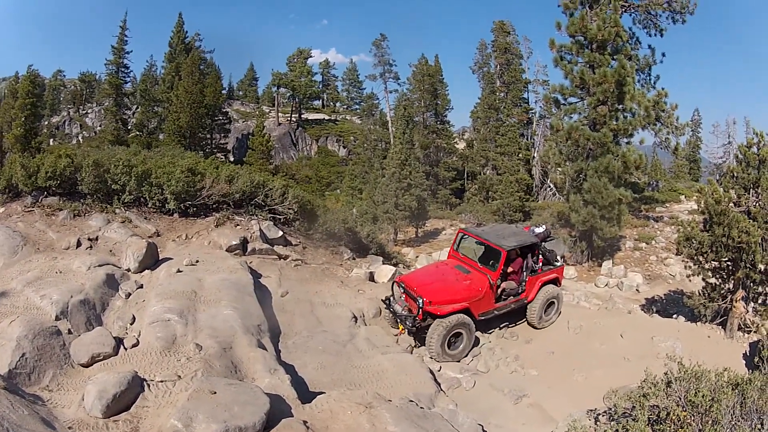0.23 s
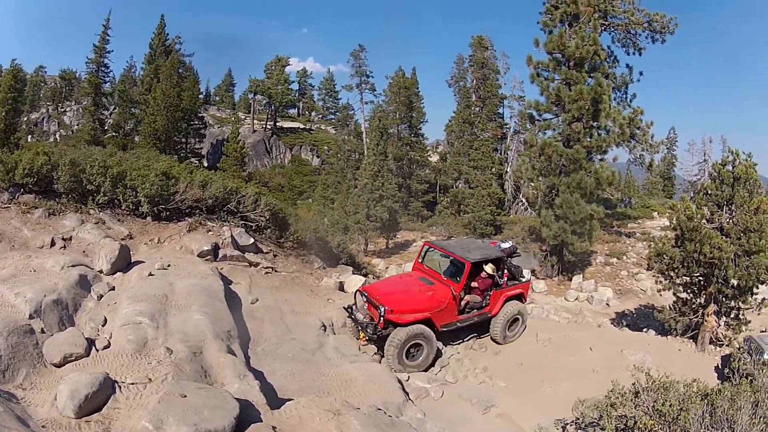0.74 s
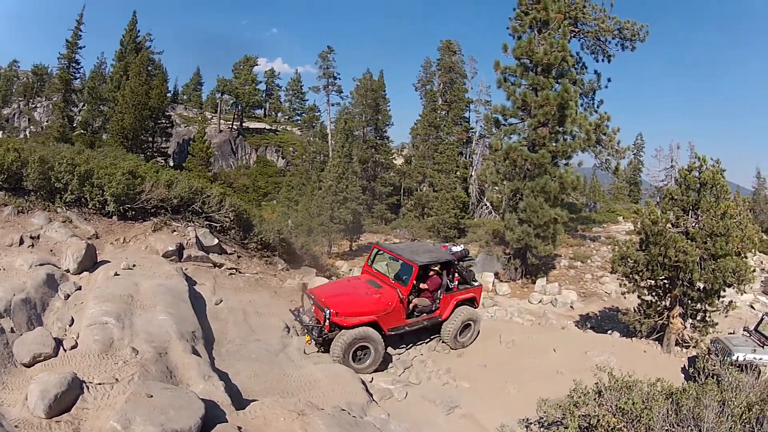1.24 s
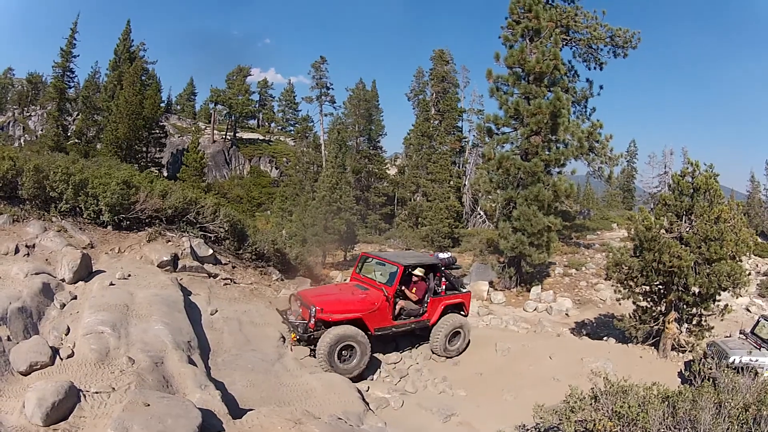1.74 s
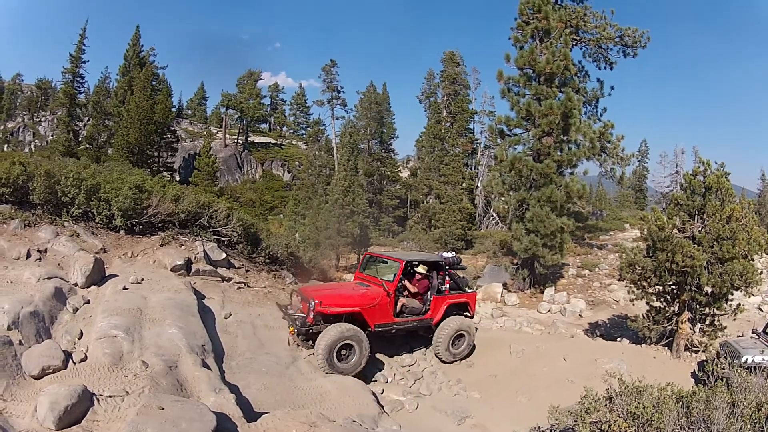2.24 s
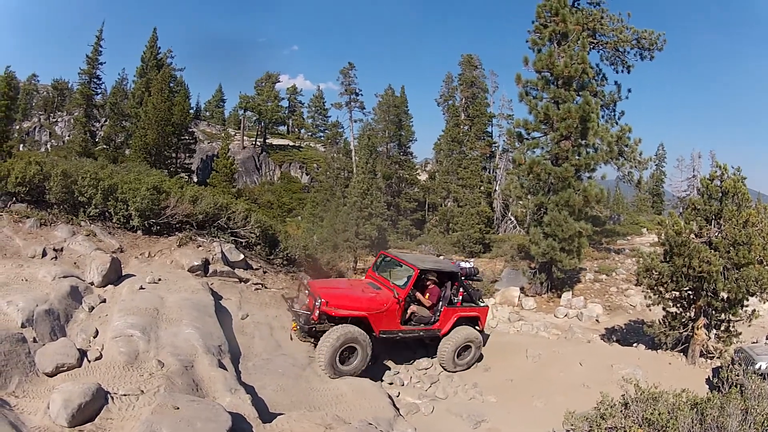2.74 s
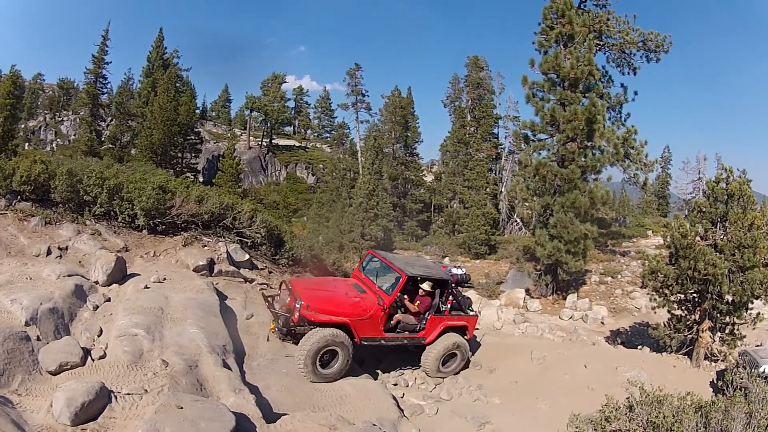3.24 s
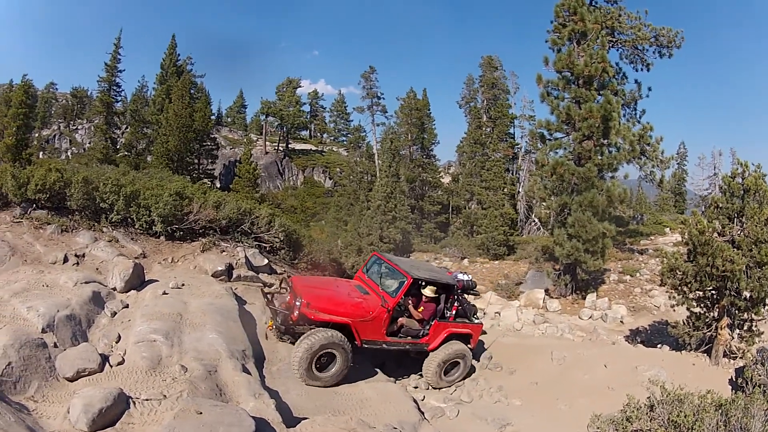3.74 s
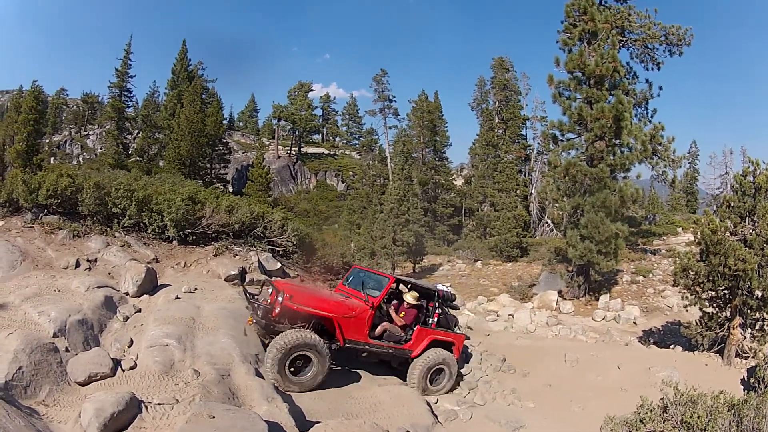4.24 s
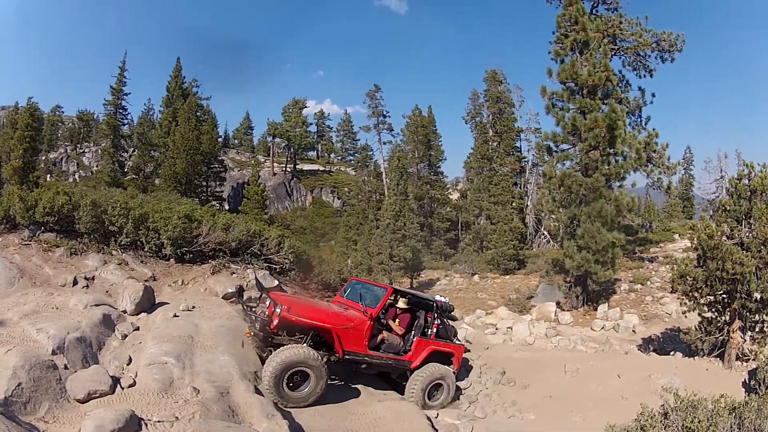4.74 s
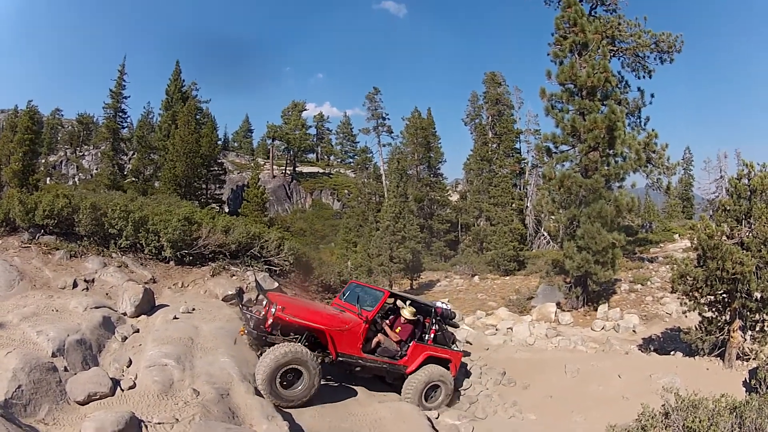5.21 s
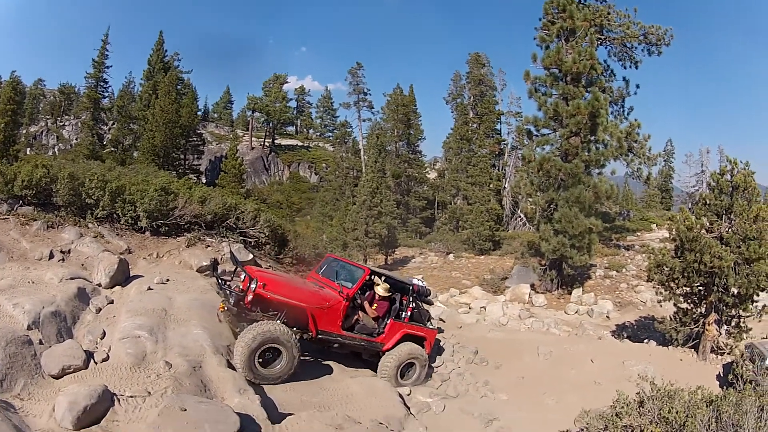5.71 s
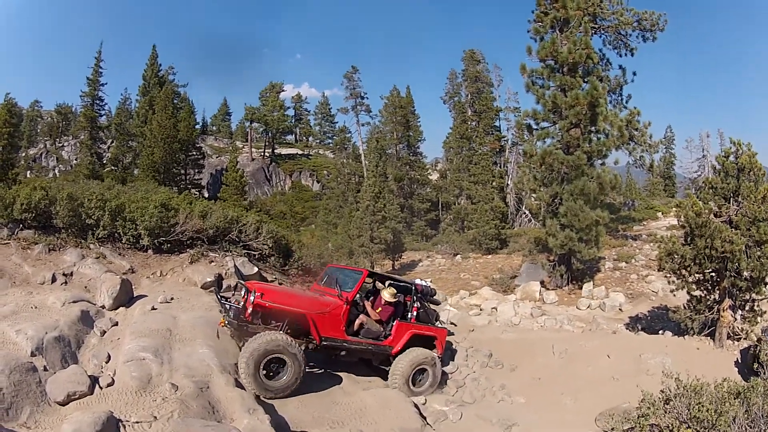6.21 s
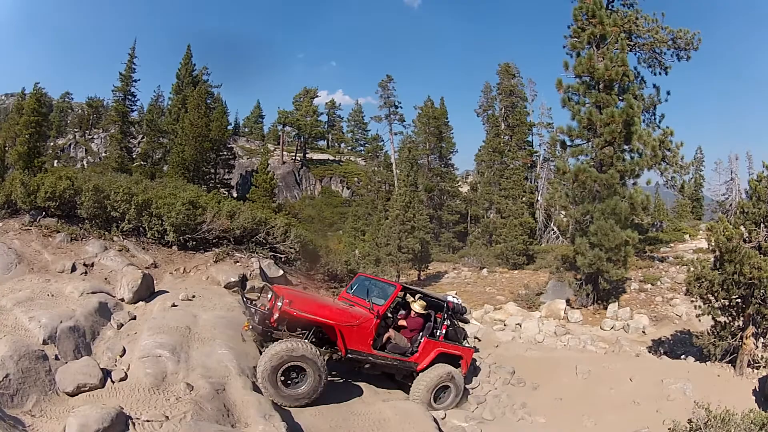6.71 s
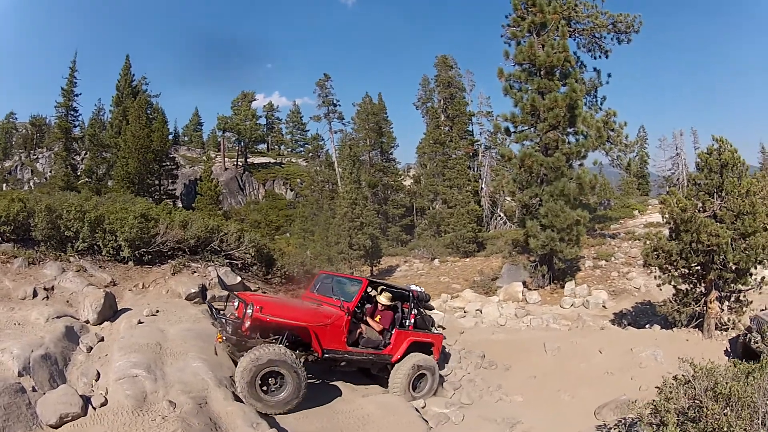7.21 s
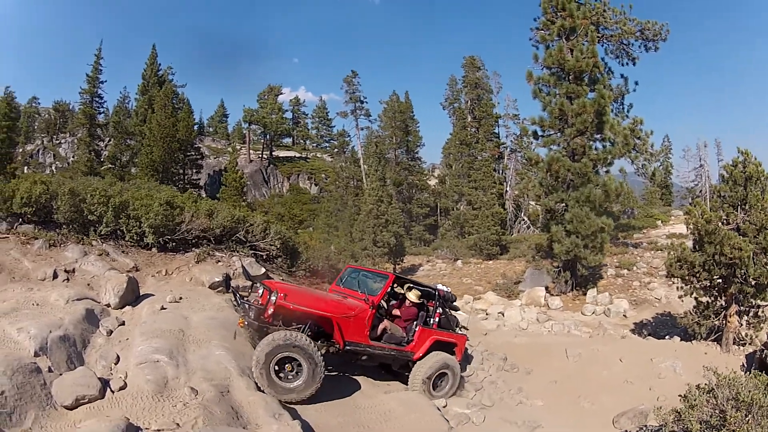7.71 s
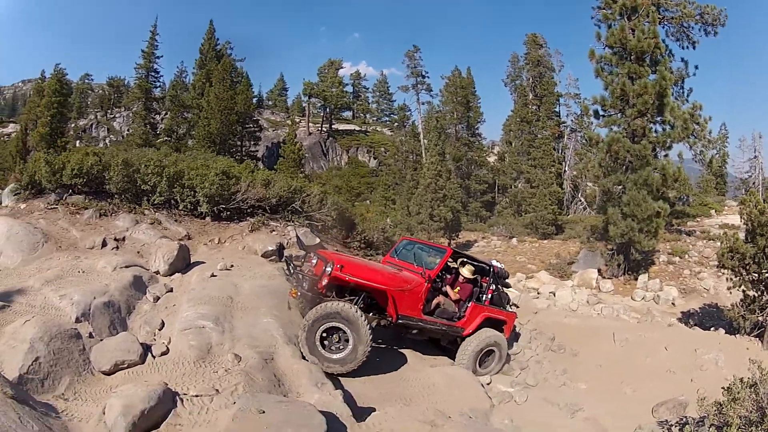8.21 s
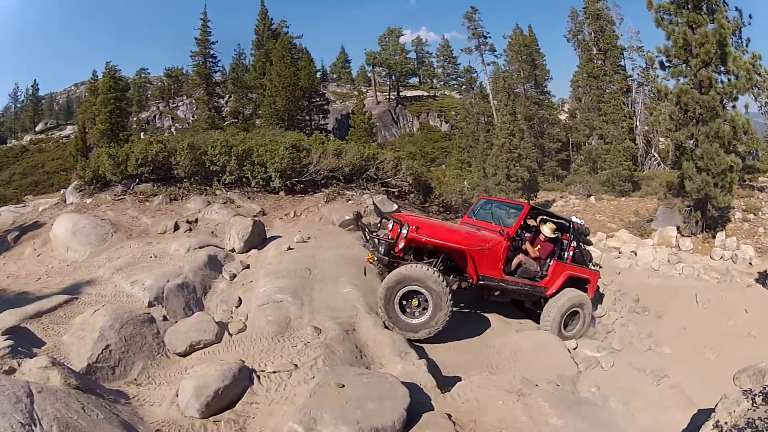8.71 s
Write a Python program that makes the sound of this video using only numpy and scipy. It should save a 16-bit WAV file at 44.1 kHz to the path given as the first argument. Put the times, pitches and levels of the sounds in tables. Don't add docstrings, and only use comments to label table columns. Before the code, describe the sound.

A distant eight-cylinder off-road vehicle burbles and surges up a rock slab, stones ticking under tyres, before a hand rubs and loudly knocks the microphone.

```python
import sys
import numpy as np
from scipy import signal
from scipy.io import wavfile
from scipy.ndimage import uniform_filter1d

SR = 44100
rng = np.random.default_rng(int(sys.argv[2]) if len(sys.argv) > 2 else 0)


def digitize_waveform(pressure):
    field = np.atleast_2d(pressure).T
    bounded = np.clip(field, -1, 1)
    quanta = np.round(bounded * 32767).astype(np.int16)
    wavfile.write(sys.argv[1], SR, quanta)


def ratio_of_db(decibels):
    return 10 ** (np.asarray(decibels, float) / 20)


N = 394681
TIME = np.arange(N) / SR
MIDWAY_S = 4.5


def evened(x):
    return x / np.sqrt(np.mean(x ** 2) + 1e-20)


def read(points, hz):
    f, value = np.transpose(points)
    return np.interp(np.log(hz + 1), np.log(f + 1), value)


def curve(rows):
    s, value = np.transpose(rows)
    return np.interp(TIME, s, value)


def swells(rows):
    return sum(height * np.exp(-(2 * (TIME - s) / length) ** 2) for s, length, height in rows)


def add(mix, s, sound):
    part = mix[round(s * SR):][:len(sound)]
    part += sound[:len(part)]


def drift(top_hz, step=1):
    t = TIME[::256, None]
    hz = np.geomspace(top_hz / 20, top_hz, 16)
    sines = np.sin(2 * np.pi * (hz * t + rng.random(16)))
    slow = (sines / np.sqrt(hz)).sum(1)
    return np.interp(TIME[::step], t[:, 0], evened(slow))


def noise(spectrum, patchy_db, peaks=()):
    frames = N // 256 + 5
    hz = np.fft.rfftfreq(1024, 1 / SR)[:140]
    a, b, patches = rng.standard_normal((frames, 140, 3)).T
    patches = uniform_filter1d(patches, size=10, axis=0)
    patches = evened(uniform_filter1d(patches, size=12, axis=1))
    lift = 1 + sum(ratio_of_db(db + 7.5) / (1 + (2 * (hz - f) / width) ** 2) for f, width, db in peaks)
    shape = ratio_of_db(read(spectrum, hz)) * lift
    z = np.zeros((513, frames), complex)
    z[:140] = (a + 1j * b) * shape[:, None] * ratio_of_db(patchy_db * patches)
    return evened(signal.istft(z, nperseg=1024, noverlap=768)[1][:N])


def rung(hz, width_hz, count=N):
    steadiness = 0.6
    r = np.exp(-np.pi * width_hz / SR)
    poles = [1, -2 * r * np.cos(2 * np.pi * hz / SR), r * r]
    x = rng.standard_normal(count)
    for _ in range(2):
        x = signal.lfilter([1, 0, -1], poles, x)
    x = evened(x)
    power = abs(uniform_filter1d(x ** 2, round(4 * SR / hz)))
    return evened(x / (power + 0.02) ** (steadiness / 2))


# time in seconds, engine cycles per second.
SPEED = [(0.0, 8.48), (0.732, 7.12), (1.015, 8.78), (1.559, 9.06), (1.87, 11.04), (2.276, 9.35),
         (3.596, 9.54), (4.094, 11.71), (4.472, 14.81), (4.735, 13.62), (4.835, 16.04), (5.384, 8.04),
         (5.936, 10.51), (6.639, 11.1), (7.127, 8.79), (7.432, 11.93), (7.958, 12.98), (8.95, 12.86)]
# time in seconds, length in seconds, change in cycles per second.
SURGES = [(3.07, .3, .26), (3.42, .3, -.12), (4.4, .2, .15), (4.6, .12, -.08), (4.75, .12, .15),
          (4.92, .18, -.21), (5.03, .12, .25), (5.2, .2, -.25), (5.4, .15, .35), (5.62, .25, -.18),
          (8.08, .3, .15), (8.35, .22, .15), (7.4, .2, .2), (7.78, .2, -.2), (8.92, .25, .18)]


def engine_speed():
    flywheel = round(0.15 * SR)
    speed = curve(SPEED)
    for _ in range(2):
        speed = uniform_filter1d(speed, flywheel, mode="nearest")
    return speed + swells(SURGES)


# time in seconds, exhaust drone level in dB.
THROTTLE = [(0.0, -66), (0.45, -62.5), (0.97, -51.5), (1.45, -54), (1.82, -47), (2.25, -57), (2.6, -51.5),
            (3.44, -58.5), (4.04, -43.5), (4.44, -35), (4.98, -36), (5.3, -52.5), (5.85, -43.5),
            (6.6, -40.5), (6.97, -50), (7.25, -42.5), (7.48, -38), (8.95, -38.5)]
# order, level in dB.
ORDER_DB = [(3, -26), (4, -10), (5, 6.5), (6, -12), (7, -16), (8, 6), (9, -13), (10, -16), (11, -8.5),
            (12, -19), (13, -0.5), (14, -12), (15, -6.5), (16, 4.5), (17, -19), (18, -1), (19, -15.5),
            (20, -8), (21, -16), (22, -16.5), (23, -26), (24, -8), (26, -22)]
SHAKE_ORDERS = (3, 4, 5, 6, 7, 8, 9, 19)
# blow strength, travel time through its exhaust branch in milliseconds.
FIRING = [(1.0, 3.8), (1.15, 8.5), (.65, 3.1), (.6, 4.2), (1.35, 8.3), (.6, 8.4), (.85, 8.2), (1.3, 9.0)]
# resonance in Hz, width in Hz.
MUFFLER = [(172, 19), (192, 16)]
# frequency in Hz, level in dB.
PIPE = [(30, -28), (55, -30.5), (115, -21), (128, -20), (142, -7.5), (152, -2), (165, -2.5), (176, 2),
        (190, 3.5), (201, -1), (209, -9.5), (220, -36), (235, -32), (450, -60)]
# time in seconds, length in seconds, level change in dB.
STUMBLE = [
    (5.245, 0.031, -19),
]


def exhaust(speed, turns):
    strength, travel_ms = np.transpose(FIRING)
    throttle_db = curve(THROTTLE)
    shake_db = 0.97 * np.clip(-38 - throttle_db[::20], 0, 17)
    drone = power = 0
    for k, db in ORDER_DB:
        hz = k * speed[::20]
        cycles_late = k * np.arange(8) / 8 + hz[:, None] * travel_ms / 1000
        blows = (strength * np.exp(-2j * np.pi * cycles_late)).sum(1)
        for centre, width in MUFFLER:
            blows = blows / (1 - (hz / centre) ** 2 + 1j * hz * width / centre ** 2)
        order_db = db + (k in SHAKE_ORDERS) * shake_db
        size = ratio_of_db(order_db + read(PIPE, hz) + 1.1 * drift(6.0, step=20))
        phase = 2 * np.pi * k * turns[::20] + np.angle(blows) + 0.1 * drift(5.0, step=20)
        drone = drone + size * np.cos(phase)
        power = power + size ** 2 / 2
    drone = drone / np.sqrt(uniform_filter1d(power, size=200))
    return ratio_of_db(throttle_db + swells(STUMBLE)) * signal.resample_poly(drone, 20, 1)[:N]


# level at cruise in dB, dB per dB of throttle,
# dB per octave of speed, dB per second of climbing closer.
HISS_LAW = (-60, 0.127, 8.5, 0.47)
RUMBLE_LAW = (-60.5, 0.9151, -4.5, 0.8)
THRUM_LAW = (-63, -0.23, -5, 1.6)
BOOM_LAW = (-63, .5, -3, 0.3)


def follows(law, speed):
    base_db, per_db, per_octave, per_s = law
    cruise_db, cruise_hz = -45, 10.5
    load_db = per_db * (curve(THROTTLE) - cruise_db)
    return base_db + load_db + per_octave * np.log2(speed / cruise_hz) + per_s * (TIME - MIDWAY_S)


# time in seconds, length in seconds, lift in dB.
SCRUBS = [
    (1.4, .25, -1.5),
    (2.5, 0.53, 5),
    (4.2, 0.3, -0.5),
    (4.55, 0.62, 1),
    (4.97, 0.13, 3.5),
    (5.45, 1, 4),
    (5.9, 0.15, 2.5),
    (6.35, 0.25, 2),
    (7.15, 0.33, 3),
    (7.62, 0.099, 3.5),
]


def hiss_level(speed):
    return follows(HISS_LAW, speed) + 0.73 * swells(SCRUBS)


# frequency in Hz, level in dB per Hz.
HISS = [(410, -59), (700, -34), (807, -6), (1230, -12.5), (1620, -6), (1830, -7.5), (2100, -2),
        (2550, -7.5), (2760, -12), (3130, -12.5), (3900, -15), (5300, -15.5), (5900, -21.5), (7670, -80),
        (13000, -120)]
RUMBLE = [(140, -3.5), (230, 5), (285, -2), (586, -5.5), (662, -23), (806, -8.5), (1000, -22), (1300, -23),
          (2200, -120)]
THRUM = [(18, -19), (32, -10), (50, 0.5), (90, -9), (130, -9.5), (200, -1.5), (300, -101)]
# frequency in Hz, width in Hz, level in dB.
PANELS = [(800, 33, -3.5), (1662, 36, -5), (2096, 144, -3), (2517, 85, -4.5), (2785, 57, -2.5),
          (2977, 37, -0.5), (3320, 70, -4.5), (3775, 140, -5.5)]
# time in seconds, length in seconds, lift in dB.
GUSTS = [(.97, .6, 2), (1.9, 0.51, 14), (2.5, .6, 5), (3.84, 0.29, 10), (4.97, 0.22, -1), (5.8, .5, 4.5),
         (7.0, .5, 0.5), (7.55, 0.84, 12.5), (8.2, 0.47, 14.5), (8.6, 0.87, 9.5), (5.87, .1, 8),
         (6.37, .15, 8), (4.1, .15, 8), (1.75, .3, 4), (2.63, .2, 7), (3.55, .25, -7)]


def engine_bay(speed, turns):
    blow = np.array(FIRING)[(8 * turns).astype(int) % 8, 0]
    puff = blow * np.exp(-(8 * turns % 1) / 0.51)
    hiss = evened(noise(HISS, 0.95, PANELS) * (1 + 0.5 * puff) * ratio_of_db(0.72 * drift(25)))
    rumble = evened(noise(RUMBLE, 2.7) * (1 + 0.62 * puff) * ratio_of_db(drift(25)))
    thrum = ratio_of_db(follows(THRUM_LAW, speed) + swells(GUSTS)) * noise(THRUM, 1.6)
    rumble_db = follows(RUMBLE_LAW, speed) + 1.24 * swells(SCRUBS)
    return ratio_of_db(hiss_level(speed)) * hiss + ratio_of_db(rumble_db) * rumble + thrum


# frequency in Hz, width in Hz, level over the hiss in dB,
# dB per second as the vehicle turns.
WHINES = [(2091, 56, -10, -0.4), (2960, 25, -21, -0.5), (2530, 80, -14, 0.6)]


def boom(speed):
    silencer = ratio_of_db(follows(BOOM_LAW, speed)) * rung(177, 6)
    whine = sum(ratio_of_db(db + per_s * (TIME - MIDWAY_S)) * rung(hz, width_hz)
                for hz, width_hz, db, per_s in WHINES)
    return silencer + ratio_of_db(hiss_level(speed)) * whine


# time in seconds, length in seconds,
# frequency in Hz, width in Hz, level in dB.
SINGS = [(.06, 0.31, 2200, 91, -68), (0.78, 0.23, 2100, 70, -66.5), (0.8, 0.51, 3100, 50, -77),
         (1.45, .4, 4620, 250, -77), (1.55, 0.64, 3780, 200, -76), (1.517, .15, 2000, 80, -68),
         (1.9, 0.29, 2160, 120, -68), (2.25, 0.32, 2900, 60, -74), (2.3, 0.17, 2020, 100, -64),
         (2.15, .15, 4150, 100, -76), (5.438, 0.027, 2410, 400, -53), (5.87, 0.088, 680, 55, -62),
         (7.328, .04, 2210, 120, -52), (8.23, 0.12, 3610, 400, -53), (4.398, 0.068, 2120, 110, -48),
         (4.97, 0.092, 2120, 120, -57), (4.97, .1, 5000, 500, -64), (5.07, .05, 5400, 200, -67),
         (.6, .3, 2700, 80, -80), (1.43, .2, 1500, 200, -70), (7.9, 0.16, 1420, 200, -63),
         (8.29, .05, 2530, 500, -45.5), (8.545, .08, 3450, 250, -56), (.15, .2, 155, 33, -67),
         (.6, .12, 150, 30, -64)]


def sings():
    out = np.zeros(N)
    for s, length, hz, width_hz, db in SINGS:
        t = np.arange(max(-s, -length), length, 1 / SR)
        add(out, s + t[0], ratio_of_db(db) * np.exp(-(2 * t / length) ** 2) * rung(hz, width_hz, count=len(t)))
    return out


# start in seconds, peak in dB, ring in Hz, 60 dB decay in seconds, thud in dB.
TICKS = [
    (2.605, -36, 670, 0.024, -39),
    (3.041, -37, 704, 0.021, -29.5),
    (4.247, -40, 775, 0.043, -54),
    (4.371, -45.5, 786, 0.11, -55),
    (4.643, -39, 677, 0.022, -52),
    (5.049, -48, 608, 0.091, -56),
    (5.88, -50.5, 660, 0.12, -53),
    (6.247, -35, 676, 0.022, -32),
    (7.099, -57, 790, 0.05, -65),
    (8.487, -29.5, 650, 0.021, -27),
]
# start in seconds, peak in dB, length in seconds, brightness (each unit adds 7.3 dB of
SCUFFS = [(0.517, -73, 0.036, -6), (1.4794, -56.5, 0.12, -1.5), (2.475, -50, 0.044, -6),
          (4.357, -39, 0.056, -5), (4.843, -39, 0.027, -0.3), (5.423, -44, 0.02, 0),
          (4.903, -50.5, 0.042, 0.7), (5.0, -47.5, .04, 0), (5.907, -45, 0.025, -6),
          (6.11, -55.5, 0.075, 0.5), (7.306, -48, 0.026, 2.5), (7.363, -49, 0.033, 0.5)]
# start in seconds, peak in dB, frequency in Hz, length in seconds.
SQUEAKS = [
    (0.515, -63, 5570, 0.018),
    (.523, -70, 5100, .005),
    (0.527, -68, 5850, .004),
    (.525, -72, 4800, .006),
    (2.247, -62.5, 560, 0.21),
    (5.016, -57.5, 4270, 0.035),
    (6.464, -65, 5320, .035),
    (6.526, -48, 5275, 0.032),
    (6.545, -57, 5200, 0.022),
]


def stones():
    out = np.zeros(N)
    t = np.arange(4000) / SR
    for s, db, hz, t60, thud_db in TICKS:
        overtone = 0.17 * np.sin(2 * np.pi * 1.47 * hz * t) * ratio_of_db(-90 * t / t60)
        ring = ratio_of_db(db + 3 - 60 * t / t60) * (np.sin(2 * np.pi * hz * t) + overtone)
        thud = np.sin(2 * np.pi * 88 * t) + 0.53 * np.sin(2 * np.pi * 235 * t)
        thud = -ratio_of_db(thud_db - 60 * t / 0.032) * thud
        add(out, s, (1 - np.exp(-t / 0.0016)) * (ring + thud))
    grit = noise(HISS, 2.0, PANELS)
    bright = evened(np.diff(grit, prepend=0))
    for s, db, length, tilt_db in SCUFFS:
        at = slice(round(s * SR), round(s * SR) + len(t))
        decay = np.exp(-(t / length) ** 2) + 0.5 * np.exp(-t / 0.016)
        shape = (1 - np.exp(-t / 0.0038)) * decay
        add(out, s, ratio_of_db(db - 9.5) * shape * (grit[at] + ratio_of_db(7.3 * tilt_db - 5) * bright[at]))
    for s, db, hz, length in SQUEAKS:
        u = np.arange(round(length * SR))
        add(out, s, ratio_of_db(db) * np.hanning(len(u)) * np.sin(2 * np.pi * hz * u / SR))
    return out


# start in seconds, peak in dB, ring in Hz.
BUMPS = [(4.608, -34.5, 298), (4.91, -38, 374), (5.955, -52, 353), (6.257, -38.5, 356), (6.375, -36.5, 430),
         (7.049, -39, 324), (7.118, -38, 410), (7.298, -32, 324), (7.53, -55, 288), (7.576, -51, 285),
         (7.744, -31.5, 358), (7.821, -39, 372), (7.962, -32, 313), (8, -31, 352), (8.063, -39, 338),
         (8.16, -31, 336), (8.199, -43, 378), (8.258, -29, 314), (8.355, -37, 397), (8.393, -7.5, 371),
         (8.486, -32.5, 450), (8.565, -40, 334), (8.611, -32.5, 336), (8.688, -31, 352), (8.779, -26, 320),
         (8.826, -30, 328), (8.927, -29.5, 320)]


def chassis():
    out = np.zeros(N)
    t = np.arange(5000) / SR
    for s, db, hz in BUMPS:
        decay = ratio_of_db(db - 60 * t / 0.048)
        add(out, s, decay * (1 - np.exp(-t / 0.0038)) * np.sin(2 * np.pi * hz * t))
    return out


# start in seconds, peak in dB, ring in Hz, 60 dB decay
# in seconds.
RATTLES = [(1.71, -41, 93, .12), (2.21, -41.5, 90, 0.13), (2.46, -47, 2070, 0.034), (2.605, -51, 211, 0.12),
           (2.6055, -46, 1150, 0.013), (3.0412, -45, 1250, 0.011), (4.185, -44, 315, .05),
           (4.242, -39, 500, 0.044), (4.3615, -51, 2200, .05), (4.364, -49, 3640, .04),
           (4.506, -43, 343, 0.056), (4.689, -38.5, 332, 0.061), (4.8244, -40, 2150, 0.031),
           (4.855, -46, 1190, 0.043), (4.9023, -49, 2500, .04), (4.945, -46, 785, 0.049),
           (4.9676, -45, 2150, 0.044), (4.975, -48, 2900, .05), (5.0634, -46, 2450, 0.053),
           (5.1377, -48, 2460, 0.06), (5.381, -54, 467, 0.12), (5.42, -48.5, 507, 0.11),
           (5.508, -51.5, 414, 0.19), (5.915, -46, 2100, 0.045), (6.123, -46, 315, .08),
           (6.2472, -37, 1400, 0.0071), (6.36, -49, 310, .08), (6.636, -43, 330, 0.12),
           (.72, -59, 179, .35), (7.14, -42, 333, 0.085), (7.3108, -50, 1150, .04), (7.32, -42, 398, 0.11),
           (7.37, -45, 382, .06), (7.577, -46, 500, 0.043), (7.638, -46, 2120, .05),
           (7.84, -35, 334, 0.074), (7.9693, -47, 2140, 0.044), (8.3605, -25, 2280, 0.011),
           (8.3805, -22.5, 2600, 0.011), (8.2025, -28, 1900, 0.013), (8.3188, -30, 1890, .012),
           (8.3188, -26, 800, .02), (8.4875, -33, 1700, .015), (8.4875, -48, 3430, .012),
           (8.521, -38, 810, 0.031), (8.538, -37, 754, 0.066), (8.555, -46, 850, 0.028),
           (8.575, -47, 646, .03), (8.67, -42, 1670, 0.056), (8.685, -50, 3500, 0.033),
           (8.852, -40, 2070, .02), (8.915, -49, 2080, 0.067)]


def rattles():
    out = np.zeros(N)
    t = np.arange(6000) / SR
    for s, db, hz, t60 in RATTLES:
        decay = ratio_of_db(db - 60 * t / t60)
        add(out, s, -decay * (1 - np.exp(-2.5 * hz * t)) * np.sin(2 * np.pi * hz * t))
    return out


# start in seconds, length in seconds, fingertip rustle in dB,
# palm scrape in dB, swell over the stroke in dB.
STROKES = [
    (8.078, 0.13, -35.5, -54, -4.5),
    (8.18, 0.086, -46, -50, 0.5),
    (8.253, 0.085, -38.5, -44, -6.5),
    (8.3, 0.032, -60, -33, 1),
    (8.33, 0.05, -47, -38.5, -1),
    (8.383, 0.03, -45, -38, 4),
    (8.475, 0.11, -50.5, -48, 5),
    (8.567, 0.42, -52, -47, -7),
]


def stroked(column):
    roundness = 0.63
    out = np.zeros(N)
    for row in STROKES:
        s, length, swell_db = row[0], row[1], row[4]
        u = np.arange(0, length, 1 / SR) / length
        add(out, s, abs(np.sin(np.pi * u)) ** roundness * ratio_of_db(row[column] + swell_db * u))
    return out


# frequency in Hz, level in dB per Hz.
RUB_TONE = [(150, -39), (285, -9), (538, -11.5), (902, -9), (1700, -4), (2190, -2.5), (2930, -12),
            (3520, -3), (3950, -15.5), (4300, -22), (4770, -23), (5900, -27), (7670, -62), (13000, -120)]
PALM = [(200, -90), (300, -3), (520, -24), (640, -3), (800, -3.5), (950, -7), (1300, -48), (1800, -90)]
# start in seconds, peak in dB, frequency in Hz, number of cycles.
PUSHES = [
    (8.082, -22.5, 48.7, 2.9),
    (8.256, -15.5, 53, 2.2),
    (8.305, -20.5, 60, 1.3),
    (8.3171, -17.5, 135, 2.8),
    (8.308, -19, 45, 1.23),
    (8.3545, -13, 230, 2.12),
    (8.363, -16.5, 142, 1.46),
    (8.371, -19, 115, 1.3),
    (8.374, -11, 110, 2.4),
    (8.394, -12, 192, 3.55),
]
# start in seconds, peak in dB, brightness in dB per octave.
KNOCKS = [(8.088, -32, 14), (8.114, -33, 25), (8.128, -32, 20), (8.152, -30, 14), (8.103, -34, 14),
          (8.168, -31, 18), (8.218, -36, 18), (8.238, -36, 18), (8.183, -30, 24), (8.276, -26, 21),
          (8.292, -35, 15), (8.202, -23, 5.5), (8.2615, -30, 0), (8.3185, -15.5, 8.5), (8.3532, -18, 4),
          (8.3563, -7, 7), (8.368, -19.5, 11), (8.3713, -23, 6), (8.3744, -15, 2), (8.3765, -7, 12),
          (8.395, 0, 8)]
# frequency in Hz, level in dB, 60 dB decay in seconds.
HOUSING = [(408, 1, 0.086), (672, 11.5, 0.021), (858, 13, 0.021), (1090, 0.5, 0.012), (1400, -13, 0.013),
           (1830, 5.5, 0.0094), (2120, -4, 0.022), (2720, -16, 0.0085), (3500, -5, 0.0092),
           (4540, -27, 0.011)]


def hand():
    grains = 1 + 6.7 * (rng.random(N) < 0.006)
    rustle = noise(RUB_TONE, 1.4) * uniform_filter1d(grains, size=60)
    out = stroked(column=2) * ratio_of_db(2 * drift(60)) * rustle
    out += stroked(column=3) * ratio_of_db(0.89 * drift(35)) * noise(PALM, 1.0)
    for s, db, hz, cycles in PUSHES:
        u = np.arange(round(cycles / hz * SR))
        wave = np.cos(2 * np.pi * hz * (u - len(u) / 2) / SR)
        add(out, s, -ratio_of_db(db) * np.hanning(len(u)) * wave)
    t = np.arange(3000) / SR
    early = t[:500]
    for s, db, bright_db in KNOCKS:
        ring = sum(ratio_of_db(level_db + bright_db * np.log2(hz / 800) - 60 * t / t60) * np.sin(2 * np.pi * hz * t)
                   for hz, level_db, t60 in HOUSING)
        slips = rng.standard_normal(500) * (rng.random(500) < 0.06)
        blow = np.exp(-((early - 0.001) / 0.0001) ** 2)
        contact = slips * np.exp(-early / 0.0024) + blow
        knock = np.convolve(np.convolve(contact, np.hanning(9)), ring)
        add(out, s, -ratio_of_db(db) * knock / abs(knock).max())
    return out


# frequency in Hz, level in dB per Hz.
AIR = [(12, -33), (30, -10), (46, -2), (148, -16), (243, -10.5), (274, -13), (601, -22), (661, -23.5),
       (744, -23), (990, -26), (1560, -28), (2170, -24.5), (5900, -37.5), (7670, -83), (13000, -120)]


def forest_air():
    return ratio_of_db(-58 + 0.15 * drift(7.2)) * noise(AIR, 1.0)


def scene():
    speed = engine_speed()
    turns = np.cumsum(speed) / SR + 0.8
    vehicle = exhaust(speed, turns) + engine_bay(speed, turns) + boom(speed) + sings()
    impacts = stones() + chassis() + rattles()
    return (vehicle + impacts + hand() + forest_air())[None]


def band_limit(x):
    return signal.sosfilt(signal.butter(12, 15300, fs=SR, output="sos"), x)


def record(dry):
    bass_cut = signal.butter(2, 33.0, "high", fs=SR, output="sos")
    trimmed = signal.sosfilt(bass_cut, dry)
    stored = signal.resample_poly(trimmed, 40, 147, axis=1)
    held = signal.resample_poly(np.repeat(stored, 4, axis=1), 147, 160, axis=1)
    held = np.pad(held, ((0, 0), (0, 8)))[:, :N]
    edge = signal.firwin(511, 15330, window=("kaiser", 6), fs=SR)
    finished = signal.oaconvolve(held, edge[None], "same")
    return band_limit(finished)


dry = scene()
out = record(dry)
digitize_waveform(out)
```